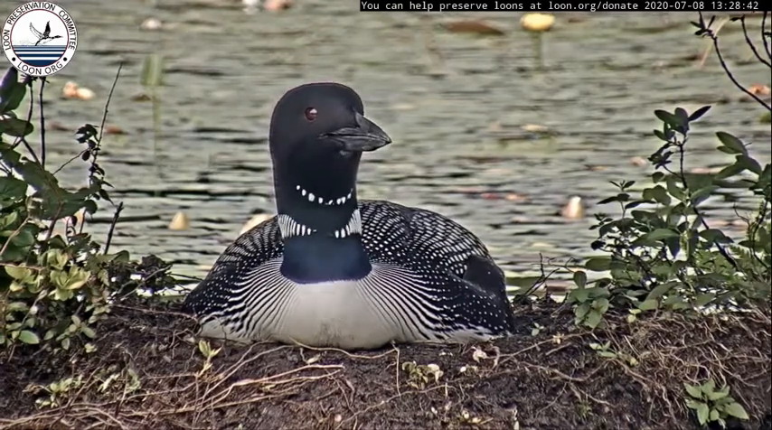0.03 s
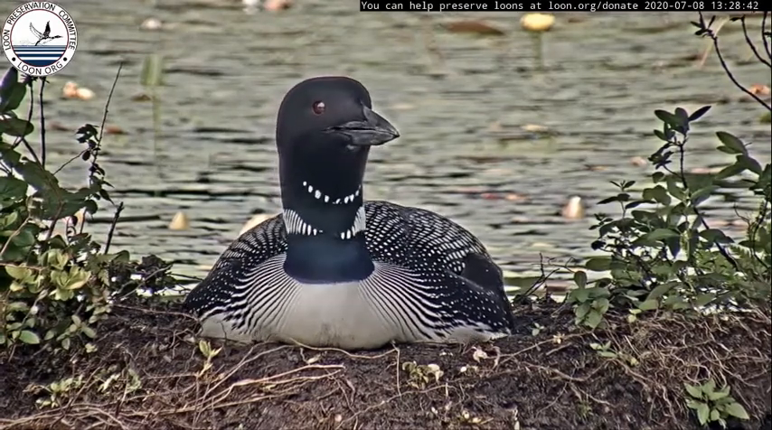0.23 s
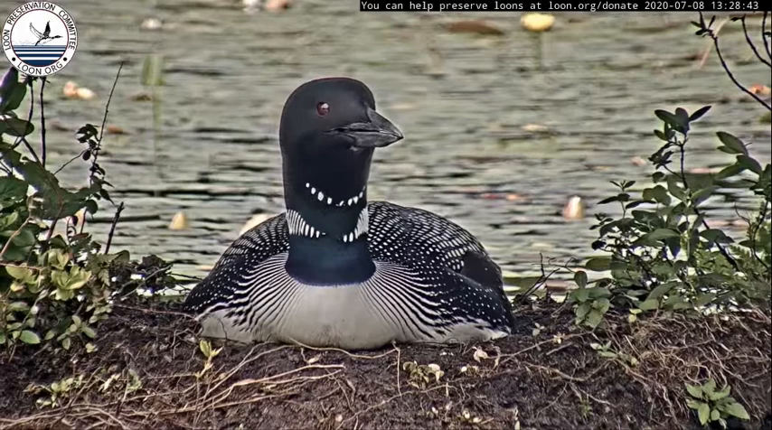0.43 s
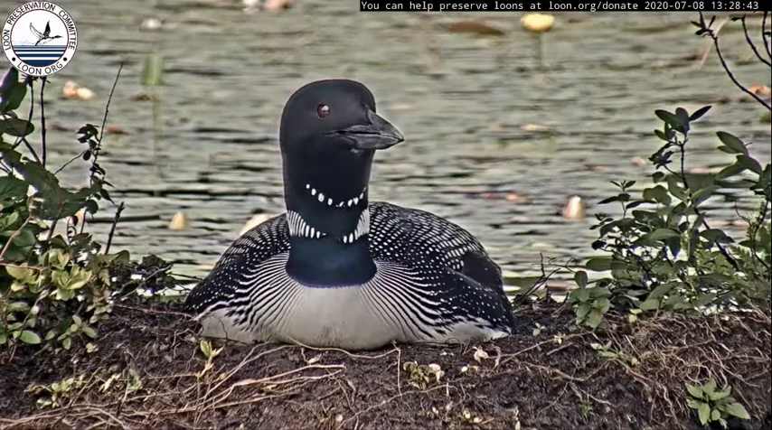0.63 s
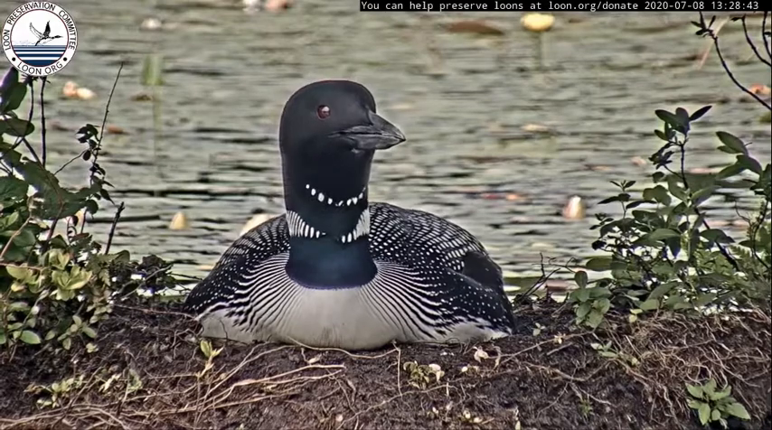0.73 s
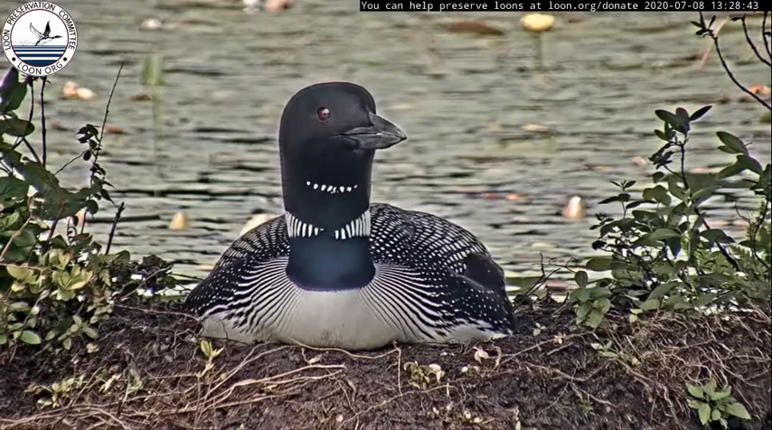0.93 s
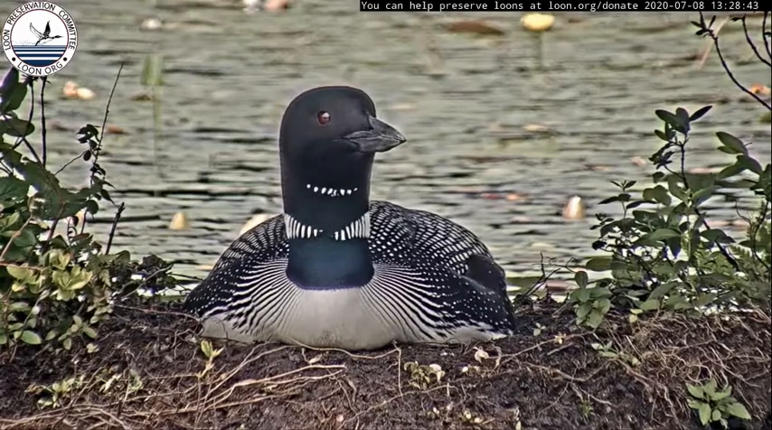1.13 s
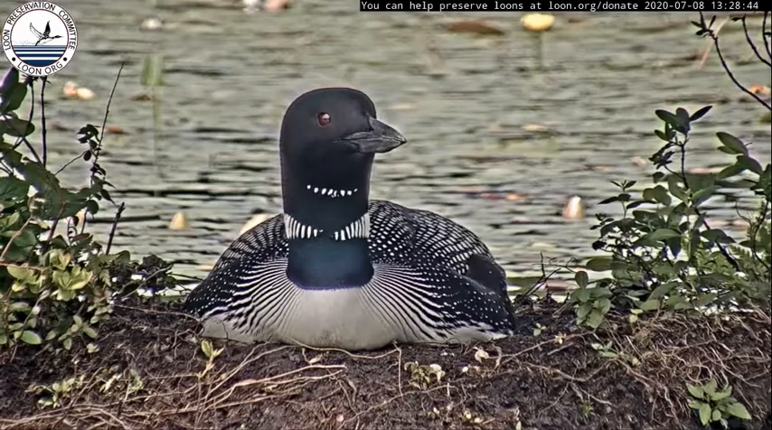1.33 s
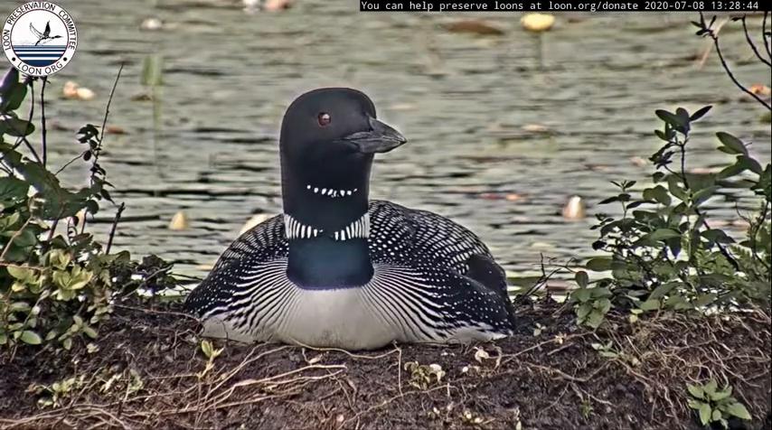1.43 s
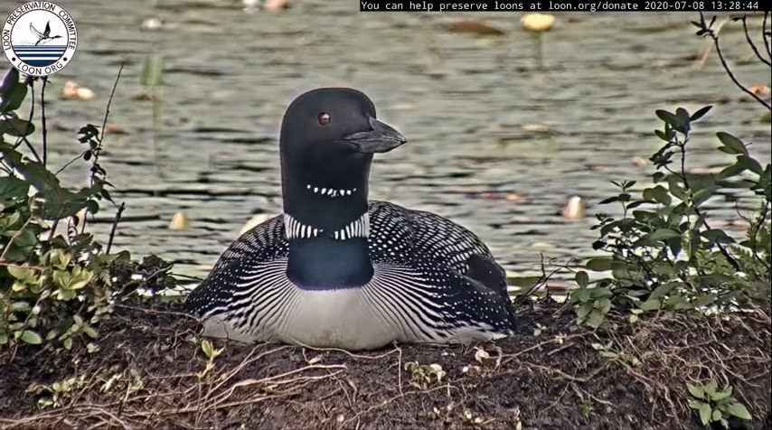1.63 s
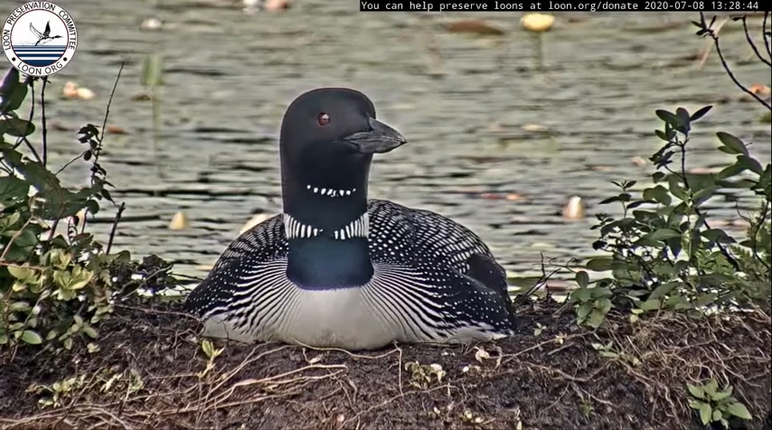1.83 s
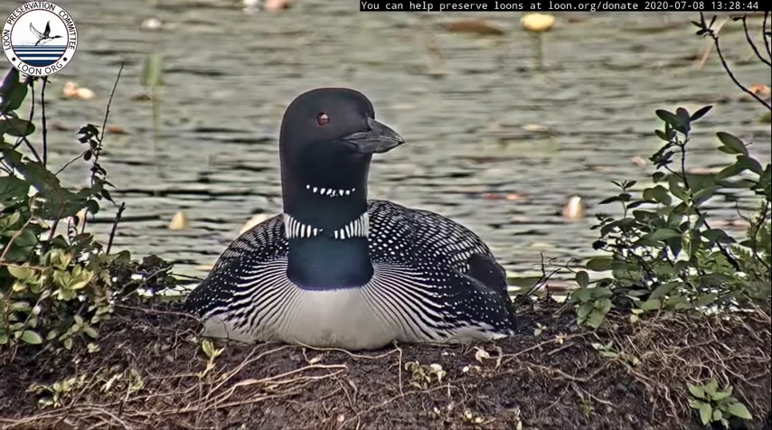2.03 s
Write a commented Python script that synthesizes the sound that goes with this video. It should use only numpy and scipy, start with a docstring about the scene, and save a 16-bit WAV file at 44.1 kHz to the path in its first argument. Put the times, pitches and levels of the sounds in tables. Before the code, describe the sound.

A loon wails once close by, over a quiet lake with faint bird chirps.

```python
"""A loon wails once, close by on its nest: a soft upward scoop, a low note, a jump to a long high note
and a jump back down. Its voice is an almost pure tone, coloured by its throat and bill, with a little
rush of air. The far shore returns the call, and small birds chirp over a quiet lake.
Once in the high note the signal skips part of a cycle, which makes a click."""
import sys
import numpy as np
from scipy import signal
from scipy.fft import rfft, irfft
from scipy.io import wavfile
from scipy.ndimage import uniform_filter1d

SR = 44100
rng = np.random.default_rng(int(sys.argv[2]) if len(sys.argv) > 2 else 0)


def put_to_file(sound):
    """Save the sound as 16-bit audio at rate SR, in the file named by the first command-line argument."""
    columns = np.atleast_2d(sound).T  # one column per channel
    safe = np.clip(columns, -1, 1)
    whole_steps = np.round(safe * 32767)
    wavfile.write(sys.argv[1], SR, whole_steps.astype(np.int16))


N = 92610
TIME = np.arange(N) / SR


def undb(db):
    """Turn decibels into a number to multiply by."""
    return 10 ** (np.asarray(db) / 20)


def curves(table):
    """Join a table's rows with straight lines in time, one curve for each later column."""
    rows = np.array(table, float)
    return [np.interp(TIME, rows[:, 0], column) for column in rows.T[1:]]


def gate(table, fade_s=0.0076):
    """Fade in at a table's first time and out at its last."""
    edge = lambda s: .5 + .5 * np.sin(np.pi * np.clip((TIME - s) / fade_s, -.5, .5))
    return edge(table[0][0]) - edge(table[-1][0])


def wander(rate_hz):
    """A smooth random wobble, about 1 in size."""
    step = int(SR / rate_hz)
    stairs = np.repeat(rng.standard_normal(N // step + 1), step)
    smooth = uniform_filter1d(uniform_filter1d(stairs, step), step)[:N]
    return smooth / smooth.std()


def noise(colour):
    """Noise of strength 1, with lows and highs balanced by a table."""
    hz, db = np.array(colour, float).T
    freqs = np.maximum(np.fft.rfftfreq(N, 1 / SR), 1)
    gains = undb(np.interp(np.log(freqs), np.log(hz), db))
    shaped = irfft(rfft(rng.standard_normal(N)) * gains, N)
    return shaped / shaped.std()


def lowpass(sound, top_hz):
    """Cut away the sound above top_hz."""
    return signal.sosfilt(signal.ellip(8, .2, 70, top_hz, fs=SR, output="sos"), sound)


# the colour of the lake's hush (frequency [Hz], relative level [dB])
LAKE_COLOUR = [(20, -9), (40, -4.5), (70, -0.5), (140, -0.5), (240, -3.5), (400, -7), (700, -15),
               (1200, -16.5), (2300, -18.5), (4000, -20.5), (5200, -28.5), (7000, -32.5), (9000, -48.5)]
# dull low swells (time [s], half-width [s], level [dB])
LOW_SWELLS = [(1.525, 0.031, -58), (1.908, 0.037, -64)]
def lake():
    """Quiet air and water, with two brief swells of a low hum."""
    swells = sum(undb(db) * np.exp(-((TIME - s) / width) ** 2) for s, width, db in LOW_SWELLS)
    hum_hz = 137 * (1 + 0.0797 * wander(100))
    hum = np.sin(2 * np.pi * np.cumsum(hum_hz) / SR)
    return noise(LAKE_COLOUR) * undb(-65 - 0.38 * wander(8)) + swells * hum


# the colour of the shore's echoes (frequency [Hz], relative level [dB])
SHORE_COLOUR = [(200, -11.5), (700, -2.5), (950, -0.5), (1500, 2.5), (2800, -2), (4500, -16), (8000, -30)]
def tree_echoes(sound, delay_s, rise_s, fade_s):
    """The wooded shore scatters a sound into a tail that drops 60 dB in fade_s."""
    age = np.maximum(TIME - delay_s, 0)
    tail = noise(SHORE_COLOUR) * (1 - np.exp(-age / rise_s)) * undb(-60 * age / fade_s)
    freqs = np.fft.rfftfreq(N, 1 / SR)
    gain_near_900_hz = np.sqrt(np.mean(abs(rfft(tail)[(freqs > 700) & (freqs < 1100)]) ** 2))
    return signal.fftconvolve(sound, tail)[:N] / gain_near_900_hz


def whistle(start_s, length_s, pitches_hz, db):
    """One bird note swells and fades as it slides, wavering, through three pitches."""
    progress = np.clip((TIME - start_s) / length_s, 0, 1)
    slide_hz = np.polyval(np.polyfit([0, .5, 1], pitches_hz, 2), progress)
    hz = slide_hz * (1 + 0.0088 * wander(200))
    loudness = undb(db + 2.2 * wander(55)) * np.sin(np.pi * progress)
    return np.sqrt(2) * loudness * np.sin(2 * np.pi * np.cumsum(hz) / SR)


# sliding notes (time [s], length [s], start pitch [Hz], middle pitch [Hz], end pitch [Hz], level [dB])
BIRD_CHIRPS = [(-.04, 0.17, 3130, 2175, 1600, -65.5), (.085, 0.084, 4650, 4100, 4150, -74),
               (.155, .06, 3850, 3653, 3000, -66.5), (1.256, 0.046, 2778, 3007, 3410, -72),
               (1.26, 0.21, 3280, 3298, 3230, -68.5), (1.251, 0.22, 3600, 4173, 3762, -81),
               (1.421, 0.15, 3670, 3530, 3380, -77.5), (1.952, 0.14, 2918, 2664, 2048, -66),
               (2.015, .13, 2550, 1854, 1496, -67)]
# a run of quick falling notes (time [s], level [dB])
BIRD_CHIPS = [(1.682, -72.5), (1.803, -73.5), (1.922, -75.5), (2.046, -77)]
def songbirds():
    """Small birds whistle far away, and the trees blur their notes."""
    notes = sum(whistle(s, length, pitches, db) for s, length, *pitches, db in BIRD_CHIRPS)
    notes += sum(whistle(s, length_s=0.027, pitches_hz=(5600, 4150, 3600), db=db) for s, db in BIRD_CHIPS)
    return notes + undb(-6.5) * tree_echoes(notes, delay_s=0.012, rise_s=.01, fade_s=0.86)


def call_echoes(call):
    """The call bounces back, duller, from the land around the lake."""
    dull = signal.sosfilt(signal.butter(2, 3200, fs=SR, output="sos"), call)
    bounce = lambda delay_s: np.interp(TIME - delay_s, TIME, dull)
    near_bank = undb(-30.5) * bounce(delay_s=0.028)
    across_water = undb(-46.5) * bounce(delay_s=.53)
    far_shore = undb(-41) * tree_echoes(call, delay_s=0.07, rise_s=0.075, fade_s=2.8)
    return near_bank + across_water + far_shore


# the colour of air in the throat (frequency [Hz], relative level [dB])
BREATH_COLOUR = [(300, -10), (800, 11), (1300, -7.5), (2300, -13.5), (3200, -3.5), (4200, -1.5),
                 (5250, -3.5), (5700, -14), (7000, -14.5), (8000, -41.5)]
# how loud that air is (time [s], level [dB])
BREATH_LEVEL = [(.13, -89), (.2, -72), (.235, -53), (.3, -59), (.4, -55), (.5, -60.5), (.8, -64),
                (.95, -64), (1.03, -69)]
# cracks in the voice (time [s], level [dB])
VOICE_CRACKS = [(0.379, -46.5), (0.936, -52)]
def breath():
    """Air rasps in the loon's throat, with a tiny burst at each end of the high note."""
    cracks = sum(undb(db) * np.exp(-((TIME - s) / .004) ** 2) for s, db in VOICE_CRACKS)
    airflow = undb(curves(BREATH_LEVEL)[0]) * gate(BREATH_LEVEL, fade_s=0.023)
    return noise(BREATH_COLOUR) * (cracks + airflow)


# a tone under the voice (time [s], pitch [Hz], level [dB], relative level of its octave [dB])
UNDERTONE_PATH = [(.378, 215, -63.5, 2.5), (.41, 158, -64, 5.5), (.455, 182, -66, 9), (.475, 240, -61, -3),
                  (.52, 243, -65.5, -1), (.55, 205, -65, 8), (.58, 320, -60.5, -22.5),
                  (.65, 345, -64.5, -22.5)]
def undertone():
    """A faint low tone wavers in the throat after the jump to the high note."""
    hz, db, octave_db = curves(UNDERTONE_PATH)
    phase = 2 * np.pi * np.cumsum(hz * (1 + 0.03 * wander(120))) / SR
    tone = np.sin(phase) + undb(octave_db) * np.sin(2 * phase)
    return np.sqrt(2) * undb(db) * tone * gate(UNDERTONE_PATH, fade_s=0.016)


# the opening slide (time [s], pitch [Hz], level [dB], boost above harmonic 1 [dB])
SCOOP_PATH = [(.136, 428, -48.5, 2), (.152, 455, -39, 6), (.175, 507, -37, -3.5), (.195, 546, -35.5, -14.5),
              (.203, 624, -29.5, -10.5)]
# its harmonics, the tones at 1, 2, 3 times the pitch (relative level [dB])
SCOOP_HARMONICS = [0, -1, -30]
def scoop():
    """The voice starts softly and slides up, with a strong octave that then weakens."""
    hz, db, boost_db = curves(SCOOP_PATH)
    phase = 2 * np.pi * np.cumsum(hz) / SR
    tone = sum(undb(harmonic_db + (boost_db if k > 1 else 0)) * np.sin(k * phase)
               for k, harmonic_db in enumerate(SCOOP_HARMONICS, 1))
    return np.sqrt(2) * tone * undb(db) * gate(SCOOP_PATH)


# where the throat and bill ring (frequency [Hz], width [Hz], boost [dB])
THROAT_PEAKS = [(2821, 280, 7), (3689, 120, 10), (4662, 130, 8), (5208, 200, 7), (6420, 270, 7.5)]
def throat_boost_db(hz):
    """Tones get louder near the frequencies at which the throat and bill ring."""
    return sum(db / (1 + (2 * (hz - centre) / width) ** 2) for centre, width, db in THROAT_PEAKS)


def voice_note(path, harmonics, skip_cycles, flutter_db):
    """One almost pure note; its faint upper harmonics flutter and ring in the throat."""
    hz, db, boost_db, fourth_db = curves(path)
    cycles = np.cumsum(hz * (1 + 0.00049 * wander(150))) / SR
    skip_s = .5233
    cycles -= np.interp(skip_s, TIME, cycles)  # put a wave crest right at the skip
    cycles += skip_cycles * (TIME > skip_s)  # a sudden jump in the wave clicks
    tone = 0
    for k, harmonic_db in enumerate(harmonics, 1):
        if k > 2:
            wobble_db = 0.7 * wander(20) + flutter_db * wander(220)
            harmonic_db += (fourth_db if k == 4 else boost_db) + throat_boost_db(k * hz) + wobble_db
        tone += undb(harmonic_db) * np.cos(2 * np.pi * k * cycles)
    return np.sqrt(2) * tone * undb(db + 0.05 * wander(120)) * gate(path)


# the three main notes
# (time [s], pitch [Hz], level [dB], boost of harmonics 3, 5 and up [dB], boost of harmonic 4 [dB])
LOW_PATH = [(.203, 696.6, -23.5, -7, -11.5), (.216, 710.4, -20.5, -4.5, -0.5), (.26, 723.6, -17, -0.5, 4.5),
            (.3, 741.6, -15.5, -5, 1.5), (.346, 755.8, -13, 1, -4.5), (.37, 780, -12.5, -2.5, -6.5),
            (.378, 808.7, -17, -9, -9.5)]
HIGH_PATH = [(.378, 911, -17.5, -5, -1.5), (.4, 914.4, -18.5, 2.5, 1.5), (.444, 924.7, -18, -1, 4.5),
             (.5, 928.7, -18, -1.5, 1), (.58, 935.9, -17, -1.5, 0), (.72, 940.8, -16.5, -3, -2),
             (.79, 937.2, -16.5, -4, -2), (.83, 925.2, -17, -3, -5), (.9, 906.7, -19.5, -4, 2.5),
             (.922, 884, -19, -12.5, -5), (.931, 922, -24, -24, -17)]
FALL_PATH = [(.931, 735, -18.5, -13.5, -14), (.944, 716.6, -16, 1.5, 6), (.975, 699.3, -18.5, -5.5, -10),
             (1.015, 666, -22, -7.5, -9.5), (1.03, 648.5, -32.5, -17.5, -6)]
# each note's harmonics, from the first up (relative level [dB])
LOW_HARMONICS = [-0.5, -30.5, -48, -40, -49, -49, -46.5, -64.5, -61]
HIGH_HARMONICS = [-1, -50, -27.5, -37, -31, -49.5, -56]
FALL_HARMONICS = [-1.5, -21, -47.5, -42, -41, -48, -55, -47, -64.5]
def wail(skip_cycles):
    """The loon's voice breaks from note to note, like a yodel."""
    low = voice_note(LOW_PATH, LOW_HARMONICS, skip_cycles, flutter_db=2)
    high = voice_note(HIGH_PATH, HIGH_HARMONICS, skip_cycles, flutter_db=0.34)
    fall = voice_note(FALL_PATH, FALL_HARMONICS, skip_cycles, flutter_db=2)
    return scoop() + low + high + fall


def scene():
    """The close wail over its echoes and the lakeside, in one channel."""
    echoes = call_echoes(wail(skip_cycles=0))  # the echoes have no click
    behind = lowpass(echoes + breath() + undertone() + songbirds() + lake(), top_hz=7100)
    return (wail(skip_cycles=.44) + behind)[None]


def record(dry):
    """The very highest treble is cut away."""
    return lowpass(dry, top_hz=15400)


dry = scene()
out = record(dry)
put_to_file(out)
```